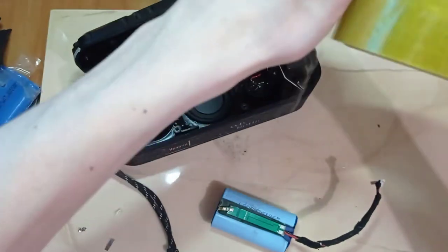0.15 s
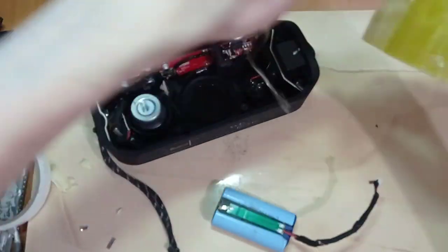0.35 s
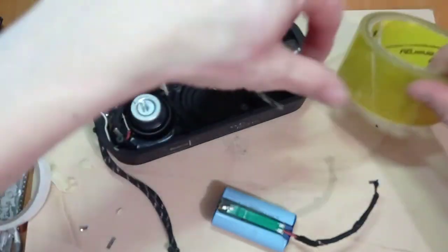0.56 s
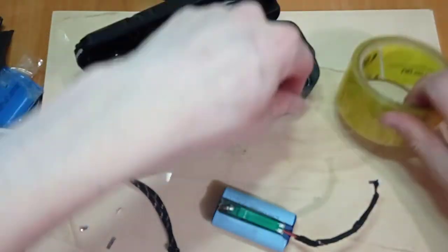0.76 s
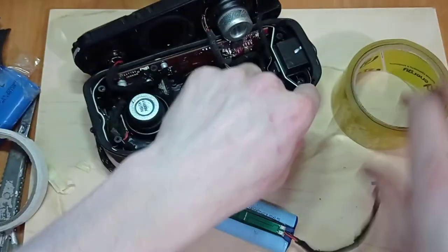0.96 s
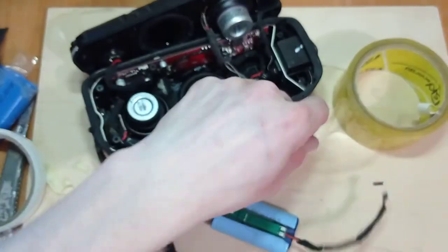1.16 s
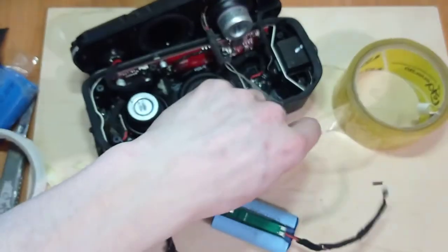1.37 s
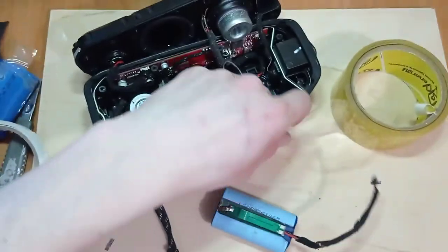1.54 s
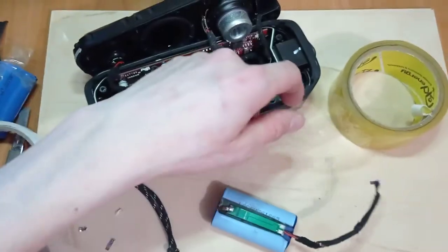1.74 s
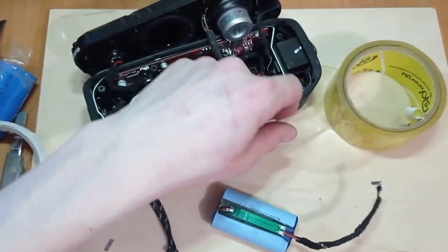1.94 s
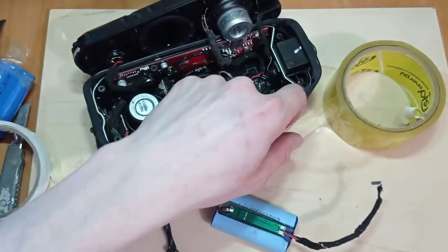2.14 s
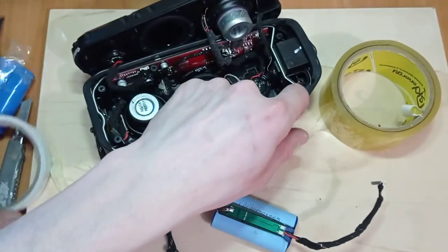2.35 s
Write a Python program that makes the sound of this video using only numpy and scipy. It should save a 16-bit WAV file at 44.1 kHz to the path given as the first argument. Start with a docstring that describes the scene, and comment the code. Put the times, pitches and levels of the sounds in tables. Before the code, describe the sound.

Packing tape is torn from its roll: faint film ticks, then sparse snaps from 0.15 seconds thicken into a loud, bright, crackling rip at 0.3-0.47, gaining body as it ends. The roll lands with hollow bumps at 0.83 and 0.96, and a faint third. From 1.4, plastic case knocks, quiet thumb rubs and faint squeaks follow, with another knock at 2.4. Low fan-like rush, small room, close mono.

```python
"""A low rush as of a fan lasts throughout, as shaped noise, with a few faint wavering tones in the background.
Handled film ticks from the start; packing tape then tears off its roll in a quick run of snaps:
cracks and fractures excite the strip. Fingers brush over it, and the roll lands with two hollow bumps
and a faint third, as decaying modes. Last a thumb rubs and squeaks the strip onto a plastic case, as slips
and tones, while the case knocks on the bench, as modes and clatter. A small room adds a diffuse tail."""
import sys
import numpy as np
from scipy import signal
from scipy.fft import rfft, irfft, next_fast_len
from scipy.io import wavfile

SR = 44100
rng = np.random.default_rng(int(sys.argv[2]) if len(sys.argv) > 2 else 0)


def to_wav(s):
    """Save 16-bit WAV."""
    ch = np.atleast_2d(s).T  # columns
    pcm = np.round(np.clip(ch, -1, 1) * 32767)  # PCM
    wavfile.write(sys.argv[1], SR, pcm.astype(np.int16))


N = 110250
TIME = np.arange(N) / SR
EVENT_TIME = TIME[:SR // 2]

# Snaps as the film gives way; crack is relative to the run, ring to the resonator's own output:
# [t/s, level/dB, crack level/dB, run length/s, film ring f/Hz, film ring level/dB]
SNAPS = [(0.1486, -38, -19.5, 0.0075, 6160, 1.5), (0.1698, -39.5, -21, 0.00796, 7100, -6),
         (0.2058, -20, -14.5, 0.0066, 7020, 3.5), (0.2453, -34, -9, 0.0034, 6494, 2.5),
         (0.3, -23.5, -5, 0.0055, 6700, 6), (0.3129, -31, -13, 0.0038, 5760, 2),
         (0.3232, -25.5, -12, 0.0083, 5940, -9), (0.3276, -31.5, -19.5, 0.0067, 5760, 1.5),
         (0.341, -31.5, -5.5, 0.002, 5766, -4), (0.3462, -18.5, -22.5, 0.006, 5850, 11.5),
         (0.3572, -22, -14, 0.0041, 5410, -4.5), (0.3672, -23, -2.5, 0.0053, 3630, -3),
         (0.3698, -20.5, -15, 0.0097, 6500, -1.5), (.3810, -18.5, -10.5, 0.006, 4960, 2.5),
         (0.3896, -29, -3.5, 0.0015, 4400, -0.5), (0.4, -18.5, -5, 0.0083, 3148, 8),
         (0.4198, -17, -7, 0.0063, 2350, 7.5), (0.436, -25.5, 0, 0.0059, 6170, -1),
         (0.444, -35.5, -3, 0.003, 6400, -9), (0.4578, -38, -2, 0.001, 6333, -19),
         (0.4661, -28.5, 2, 0.004, 2650, 4)]
# Spectrum of the film: [f/Hz, level/dB]
FILM_SPECTRUM = [(80, -12), (300, -5.5), (850, -7), (1000, -12), (1350, -3.5), (1750, -10), (2500, -6),
                 (4000, -2), (7000, -1.5), (8200, -6.5), (10000, -8), (13000, -20), (15000, -8),
                 (16000, -11)]
# Bass edge of the sound, which sinks as the freed strip grows: [t/s, f/Hz]
BASS_EDGE = [(.15, 2930), (.21, 1950), (.30, 877), (.35, 415), (.385, 338.4), (.42, 151.1)]
# Modes of the plucked strip, before the common twang level: [f/Hz, level/dB, t60/s]
TWANG_MODES = [(225, 6.5, 0.05), (418, -15.5, 0.067), (669, -4, 0.067), (860, -1.5, 0.028)]
TWANG_DB, TWANG_RISE_CYCLES = -32.5, 0.37
FILM_RING_WIDTH_HZ = 400
STRIP_PITCH_SHARE = 0.58  # round trips per second, as a share of the bass edge
STRIP_RING_DB, STRIP_RING_SHARE, STRIP_RING_WIDTH_HZ = -0.5, 1.3, 110  # share of the bass edge
TUG_DB, TUG_HZ = -9.5, 90  # tug level at the last bass edge, and its low-pass
TAPE_ROOM_DB = -13


def tape_rip():
    """Stick-slip fracture: each crack and run excites the strip and jerks the roll; the last also twangs."""
    out = np.zeros(N)
    last_edge_hz = BASS_EDGE[-1][1]
    for s, db, crack_db, length_s, ring_hz, ring_db in SNAPS:
        edge_hz = np.interp(s, *np.transpose(BASS_EDGE))
        force = film_run(length_s)
        force[0] += from_db(crack_db)
        travelling = strip_echoes(force, STRIP_PITCH_SHARE * edge_hz)
        film = film_resonances(colour(travelling, FILM_SPECTRUM), edge_hz)
        snap = cut(film, edge_hz, "high", order=3)
        film_ring = from_db(ring_db) * resonate(snap, ring_hz, FILM_RING_WIDTH_HZ)
        strip_ring = resonate(snap, STRIP_RING_SHARE * edge_hz, STRIP_RING_WIDTH_HZ)
        strip_ring = from_db(STRIP_RING_DB) * strip_ring
        # The tug weighs more as the strip grows and its bass edge sinks.
        tug = from_db(TUG_DB) * last_edge_hz / edge_hz * cut(force, TUG_HZ, "low")
        add(out, s, at_level(snap + film_ring + strip_ring + tug, db))
    twang = from_db(TWANG_DB) * ringing(TWANG_MODES, 1, TWANG_RISE_CYCLES)
    add(out, SNAPS[-1][0], twang)
    return in_room(out, TAPE_ROOM_DB)


RUN_RISE, RUN_RELEASE_S = 0.4, 0.0012  # power of time by which the run's energy grows; decay time
FRACTURES_PER_S, RUN_GRAIN_DB = 15000, 2


def film_run(length_s):
    """Crack propagation: a burst of random micro-fractures swells for its length, then quickly decays."""
    t = EVENT_TIME[:SR // 10]
    rise = np.minimum(t / length_s, 1) ** (RUN_RISE / 2)
    release = np.exp(-np.maximum(t - length_s, 0) / RUN_RELEASE_S)
    return unit(grains(len(t), FRACTURES_PER_S, RUN_GRAIN_DB) * rise * release)


STRIP_ECHO = 0.2366  # gain per round trip


def strip_echoes(x, hz):
    """Wave reflection: a feedback comb sends the wave to and fro between the roll and the held end."""
    feedback = np.zeros(int(SR / hz) + 1)
    feedback[0], feedback[-1] = 1, -STRIP_ECHO
    return signal.lfilter([1], feedback, x)


# Resonances of the taut film at the reference bass edge: [f/Hz, level/dB]
FILM_MODES = [(2370, 4), (3550, 1.5), (6980, -1.5), (8750, 2)]
FILM_MODE_WIDTH_HZ, FILM_MODES_EDGE_HZ = 110, 2000
FILM_MODE_SAG = 0.09  # power of the bass edge that the pitch follows


def film_resonances(x, edge_hz):
    """Resonance of a taut film: narrow modes stand out and sink in pitch as the strip grows."""
    pitch = (edge_hz / FILM_MODES_EDGE_HZ) ** FILM_MODE_SAG
    modes = sum(from_db(db) * resonate(x, pitch * hz, FILM_MODE_WIDTH_HZ) for hz, db in FILM_MODES)
    return x + modes


# Bumps as the roll lands and rocks; contact f is a low-pass:
# [t/s, ring level/dB, clatter level/dB, contact f/Hz, pitch factor]
ROLL_BUMPS = [(.8338, -14, -35.5, 3200, 0.99), (.9590, -11, -29.5, 2300, 0.99),
              (1.054, -32.5, -47, 650, 0.87)]
# Modes of the roll, before each bump's pitch factor and ring level: [f/Hz, level/dB, t60/s]
ROLL_MODES = [(115.26, 0, 0.084), (203, -6.5, 0.087), (246.8, -1.5, 0.096), (451.2, -14.5, 0.07),
              (548.4, -25, 0.13), (755, -21.5, 0.082), (1069, -16, 0.045), (1144, -14, 0.031),
              (1357, -22.5, 0.045), (3150, -36.5, 0.11), (5020, -40.5, 0.15)]
# Spectrum of its clatter: [f/Hz, level/dB]
ROLL_CLATTER = [(50, -15), (100, 4), (230, -20), (350, 1), (700, -4.5), (930, -10), (1200, -2), (2200, -15),
                (3300, -25.5), (6000, -30.5), (14000, -57)]
ROLL_CLATTER_T60_S, ROLL_RISE_CYCLES, ROLL_ROOM_DB = 0.1, 3.33, -11


def roll():
    """Modal impact: the cardboard core booms as it lands on the bench."""
    bumps = knocks(ROLL_BUMPS, ROLL_MODES, ROLL_CLATTER, ROLL_CLATTER_T60_S, ROLL_RISE_CYCLES)
    return in_room(bumps, ROLL_ROOM_DB)


# Knocks of the plastic case on the bench; contact f is a low-pass:
# [t/s, ring level/dB, clatter level/dB, contact f/Hz, pitch factor]
CASE_KNOCKS = [(1.452, -51, -40.5, 1100, 1.32), (1.469, -48.5, -34.5, 2000, 1),
               (1.4735, -31, -26.5, 2555, 1.024), (1.512, -50, -35, 1700, 1.11),
               (1.7945, -42, -38, 1340, 1.123), (1.830, -49.5, -52, 890, 1.2),
               (2.412, -36, -30.5, 3500, 1.323), (2.427, -64, -36.5, 2530, 1.3)]
# Modes of the case, before each knock's pitch factor and ring level: [f/Hz, level/dB, t60/s]
CASE_MODES = [(116.1, -8.5, 0.2), (269.3, -5.5, 0.13), (461.5, 0.5, 0.081), (518.7, 1.5, 0.08),
              (642, -18.5, 0.22), (1016, -7.5, 0.065), (1538, -8.5, 0.059), (2250, -18.5, 0.14),
              (3077, -10.5, 0.041)]
# Spectrum of its clatter: [f/Hz, level/dB]
CASE_CLATTER = [(50, -20.5), (120, -31), (270, 0.5), (350, -15), (500, -0.5), (680, -3), (820, -10.5),
                (1020, -8), (1400, -16.5), (2100, -16), (2900, -20), (3600, -19), (7000, -29.5),
                (14000, -42.5)]
CASE_CLATTER_T60_S, CASE_RISE_CYCLES, CASE_ROOM_DB = 0.063, 0.41, -10


def case():
    """Modal impact: the hollow case rocks under the thumb and knocks on the bench."""
    blows = knocks(CASE_KNOCKS, CASE_MODES, CASE_CLATTER, CASE_CLATTER_T60_S, CASE_RISE_CYCLES)
    return in_room(blows, CASE_ROOM_DB)


def knocks(blows, modes, clatter_spectrum, clatter_t60_s, rise_cycles):
    """Modal superposition: main modes, shifted by the grip, plus noise for dense ones; soft contacts are dull."""
    out = np.zeros(N)
    decay = from_db(-60 * EVENT_TIME / clatter_t60_s)
    for s, ring_db, clatter_db, contact_hz, pitch in blows:
        ring = cut(ringing(modes, pitch, rise_cycles), contact_hz, "low", order=1)
        clatter = colour(rng.standard_normal(len(EVENT_TIME)) * decay, clatter_spectrum)
        clatter = cut(clatter, contact_hz, "low", order=1)
        add(out, s, from_db(ring_db) * ring + at_level(clatter, clatter_db))
    return out


def ringing(modes, pitch, rise_cycles):
    """Free decay of modes: each swings up within its first cycles, so the low ones arrive last."""
    t = EVENT_TIME
    out = np.zeros(len(t))
    for k, (hz, db, t60) in enumerate(modes):
        sign = (-1) ** k  # neighbouring modes start in opposite phase
        rise = (1 - np.exp(-hz * t / rise_cycles)) ** 2
        out += sign * from_db(db - 60 * t / t60) * np.sin(2 * np.pi * pitch * hz * t) * rise
    return out


# Strokes of the fingers over the tape and the roll:
# [middle t/s, level/dB, half length/s, resonance f/Hz, resonance level/dB]
RUBS = [(0.69, -69.5, 0.039, 2510, -1), (1.669, -56, 0.041, 1800, 6.5), (1.764, -54.5, 0.041, 1133, -5),
        (1.835, -53, 0.01, 666, 17), (2.089, -60, 0.035, 802, 16), (2.234, -76, 0.0221, 7330, 27),
        (2.405, -59.5, 0.02, 2820, -10)]
# Squeaks of the thumb on the film: [middle t/s, level/dB, half length/s, f/Hz]
SQUEAKS = [(1.666, -62.5, .025, 2280), (1.742, -61, 0.043, 2242), (2.085, -68.5, 0.038, 2434)]
# Spectrum of the slips: [f/Hz, level/dB]
RUB_SPECTRUM = [(150, -21.5), (400, 6.5), (700, 3.5), (1150, 3), (1500, -9), (2500, -4.5), (4200, -6.5),
                (6300, -10), (9000, -22.5), (13000, -31), (15300, -53)]
SLIPS_PER_S, RUB_GRAIN_DB, RUB_ROOM_DB = 5000, -3.5, -11.5
RUB_RING_WIDTH = 0.27  # as a share of the resonance's pitch
RUB_JUDDER_DB, RUB_JUDDER_HZ = 2.5, 67


def thumb_rub():
    """Stick-slip friction: juddering micro-slips excite a resonance; wavering tones make the squeaks."""
    judder = from_db(RUB_JUDDER_DB * drift(RUB_JUDDER_HZ))
    slips = colour(judder * grains(N, SLIPS_PER_S, RUB_GRAIN_DB), RUB_SPECTRUM)
    out = np.zeros(N)
    for s, db, half_s, ring_hz, ring_db in RUBS:
        ring = from_db(ring_db) * resonate(slips, ring_hz, RUB_RING_WIDTH * ring_hz)
        out += swell(s, db, half_s) * rms_one(slips + ring)
    for s, db, half_s, hz in SQUEAKS:
        out += swell(s, db, half_s) * wavering_tone(hz, wander_hz=25.1, swell_db=6.0, rate_hz=87)
    return in_room(out, RUB_ROOM_DB)


def swell(s, db, half_s):
    """Gaussian envelope: a stroke swells and fades around time s."""
    return from_db(db) * np.exp(-((TIME - s) / half_s) ** 2)


# Small ticks of the handled film: [t/s, level/dB, run length/s]
TICKS = [(0.0158, -53.5, 0.0072), (0.059, -64.5, 0.022), (0.116, -62, 0.0062), (.612, -59.5, 0.0026),
         (0.651, -51.5, 0.0051), (0.9754, -55.5, 0.0042), (1.0545, -57.5, 0.0031), (1.3967, -46, 0.0047),
         (1.4334, -54.5, 0.0025), (1.491, -50.5, 0.014), (1.5684, -58.5, 0.0043), (2.039, -54, 0.0041),
         (2.399, -57, 0.0031)]
# Spectrum of a tick: [f/Hz, level/dB]
TICK_SPECTRUM = [(300, -16.5), (1500, -11), (2300, -3), (4000, -4), (6400, 1.5), (8500, -8), (12500, -23),
                 (15300, -15)]
TICK_ROOM_DB = -9.5


def film_ticks(crack_db=-13):
    """Impulsive excitation: slack film crinkles and sticks under the fingers, a crack and a run per tick."""
    out = np.zeros(N)
    for s, db, length_s in TICKS:
        force = film_run(length_s)
        force[0] += from_db(crack_db)
        add(out, s, at_level(colour(force, TICK_SPECTRUM), db))
    return in_room(out, TICK_ROOM_DB)


# Spectrum of the low rush: [f/Hz, level/dB]
RUSH_SPECTRUM = [(25, -33.5), (70, -22.5), (120, -8), (190, -6.5), (260, -4.5), (350, 1.5), (440, -18),
                 (600, -21.5), (1200, -33), (4500, -41.5), (16000, -50.5)]
# Course of the background, before the offsets of rush and tones: [t/s, level/dB]
BACKGROUND_LEVEL = [(0, -62.5), (.19, -59), (.55, -70.5), (.8, -74), (1.1, -69.5), (1.4, -66), (1.7, -62),
                    (2.5, -64)]
# Wavering tones of the background, before their offset and the course: [f/Hz, level/dB]
BACKGROUND_TONES = [(118.4, -73.5), (157, -76.5), (258, -71), (352, -68)]
RUSH_DB, TONES_DB = -2.5, -1.5  # offsets
TONE_WANDER, TONE_SWELL_DB, TONE_DRIFT_HZ = 0.031, 3.5, 13  # wander as a share of the pitch


def fan_background():
    """Broadband and tonal noise: a low rush with a few faint wavering tones in the background."""
    level_db = np.interp(TIME, *np.transpose(BACKGROUND_LEVEL))
    rush = rms_one(colour(rng.standard_normal(N), RUSH_SPECTRUM))
    tones = np.zeros(N)
    for hz, db in BACKGROUND_TONES:
        tones += from_db(db) * wavering_tone(hz, TONE_WANDER * hz, TONE_SWELL_DB, TONE_DRIFT_HZ)
    tones_db = TONES_DB + level_db - level_db.mean()
    return from_db(level_db + RUSH_DB) * rush + from_db(tones_db) * tones


def wavering_tone(hz, wander_hz, swell_db, rate_hz):
    """Frequency and amplitude modulation: a tone whose pitch and level wander at random; rms 1."""
    phase = 2 * np.pi * np.cumsum(hz + wander_hz * drift(rate_hz)) / SR
    return rms_one(np.sin(phase) * from_db(swell_db * drift(rate_hz)))


def drift(rate_hz):
    """Band-limited random modulation: low-passed noise of rms 1, its first second dropped."""
    return rms_one(cut(rng.standard_normal(N + SR), rate_hz, "low")[SR:])


# Reverberation time of the room: [f/Hz, t60/s]
ROOM_T60 = [(100, 0.27), (700, 0.229), (3000, 0.2217), (7000, 0.22), (15000, 0.15)]
ROOM_DELAY_S = 0.0045


def in_room(x, wet_db):
    """Diffuse reverberation: the sound and its exponential noise tail, which dies sooner in the treble."""
    size = len(EVENT_TIME)
    white = rfft(rng.standard_normal(size))
    hz = np.fft.rfftfreq(size, 1 / SR)
    edges = np.r_[0, np.geomspace(200, SR / 2, num=7)]
    tail = np.zeros(size)
    for lo, hi in zip(edges, edges[1:]):
        band = irfft(white * (hz >= lo) * (hz < hi))
        tail += band * from_db(-60 * EVENT_TIME / at_hz(ROOM_T60, (lo + hi) / 2))
    tail = unit(tail * (EVENT_TIME > ROOM_DELAY_S))
    return x + from_db(wet_db) * signal.fftconvolve(x, tail)[:N]


def grains(size, per_s, spread_db):
    """Poisson-like excitation: micro-clicks of uneven strength at random moments; rms 1."""
    happens = rng.random(size) < per_s / SR
    strength = from_db(spread_db * np.minimum(rng.exponential(1, size), 4))
    return rms_one(happens * rng.standard_normal(size) * strength)


def resonate(x, hz, width_hz):
    """Damped oscillator: one two-pole resonance, gain 1 on top."""
    r = np.exp(-np.pi * width_hz / SR)
    zeros = np.array([1, 0, -1]) * (1 - r * r) / 2
    poles = [1, -2 * r * np.cos(2 * np.pi * hz / SR), r * r]
    return signal.lfilter(zeros, poles, x + 1e-18)


def colour(x, spectrum):
    """Minimum-phase filtering: the folded cepstrum gives a causal filter with the given spectrum."""
    size = 2 * next_fast_len(len(x))
    gain = from_db(at_hz(spectrum, np.fft.rfftfreq(size, 1 / SR)))
    cepstrum = irfft(np.log(gain))
    cepstrum[1:size // 2] *= 2
    cepstrum[size // 2 + 1:] = 0
    return irfft(rfft(x, size) * np.exp(rfft(cepstrum)))[:len(x)]


def cut(x, hz, kind, order=2):
    """Butterworth response: low- or high-pass."""
    sos = signal.butter(order, min(hz, SR / 2 - 1), kind, fs=SR, output="sos")
    return signal.sosfilt(sos, x + 1e-18)


def at_hz(points, hz):
    """Logarithmic frequency scale: read a table by interpolation."""
    f, value = np.transpose(points)
    return np.interp(np.log(np.maximum(hz, 1)), np.log(f), value)


def from_db(db):
    """Level definition: decibels to amplitude gain."""
    return 10 ** (np.asarray(db) / 20)


def rms_one(x):
    """Power normalisation: scale to rms 1."""
    return x / np.sqrt(np.mean(x ** 2) + 1e-20)


def unit(x):
    """Energy normalisation: scale to energy 1."""
    return x / np.sqrt(np.sum(x ** 2) + 1e-20)


LEVEL_WINDOW_S = 0.005


def at_level(x, db):
    """Energy-equivalent level: the event's whole energy, taken as rms over the level window."""
    return unit(x) * from_db(db) * np.sqrt(LEVEL_WINDOW_S * SR)


def add(out, s, x):
    """Linear superposition: mix an event in at time s."""
    i = max(int(s * SR), 0)
    out[i:i + len(x)] += x[:N - i]


def scene():
    """Linear superposition: everything at the bench, in one channel."""
    return (tape_rip() + film_ticks() + roll() + case() + thumb_rub() + fan_background())[None]


CUTOFF_HZ = 15900


def record(dry):
    """Band limitation: the microphone loses the deepest bass, and the top is cut steeply."""
    thin = cut(dry, 50, "high")
    steep = signal.ellip(10, 0.3, 75, CUTOFF_HZ, fs=SR, output="sos")
    return signal.sosfilt(steep, thin)


dry = scene()
out = record(dry)
to_wav(out)
```